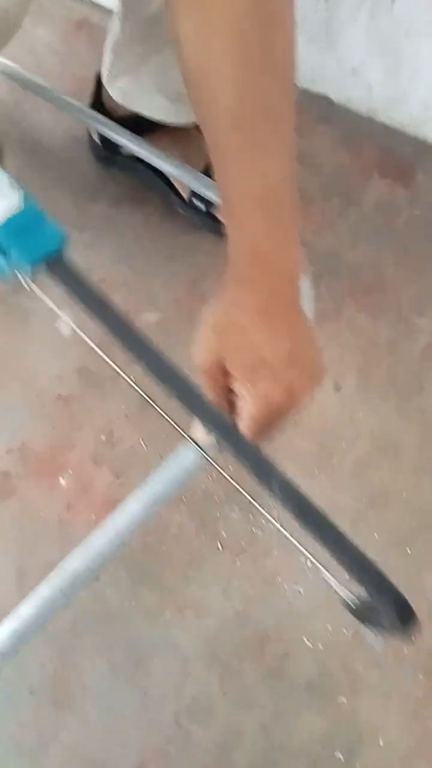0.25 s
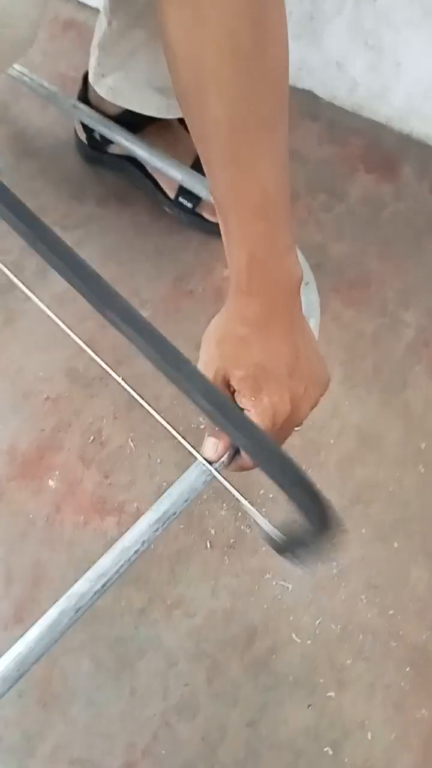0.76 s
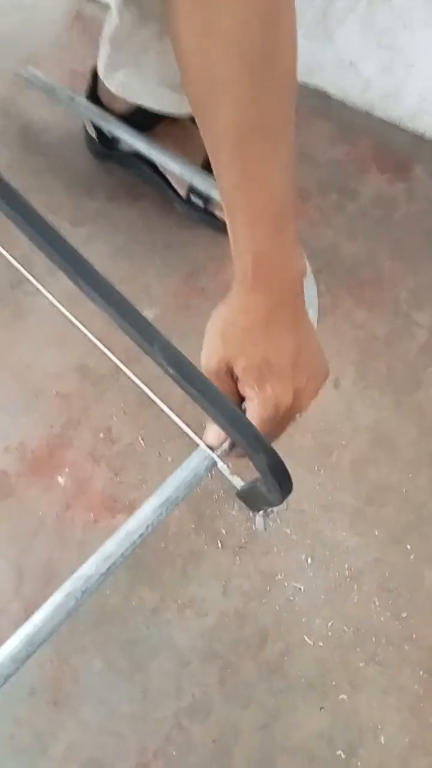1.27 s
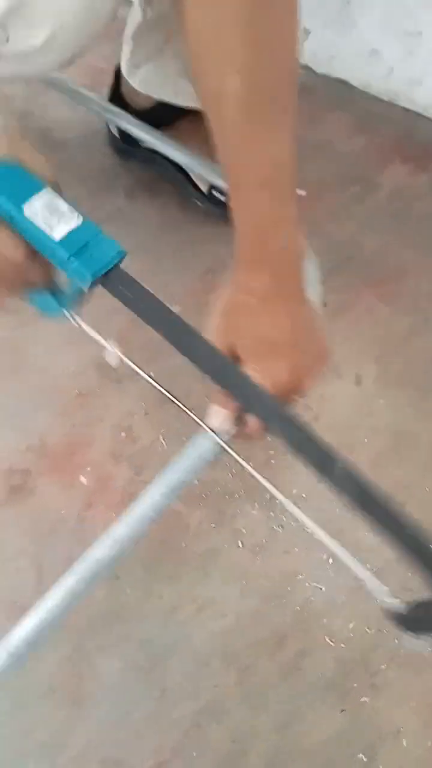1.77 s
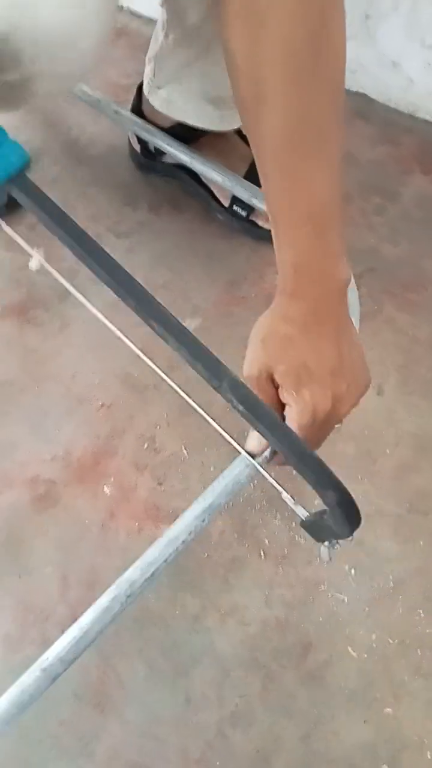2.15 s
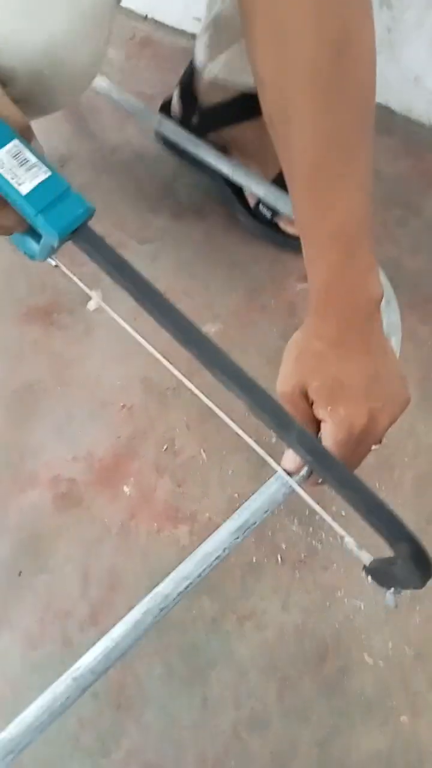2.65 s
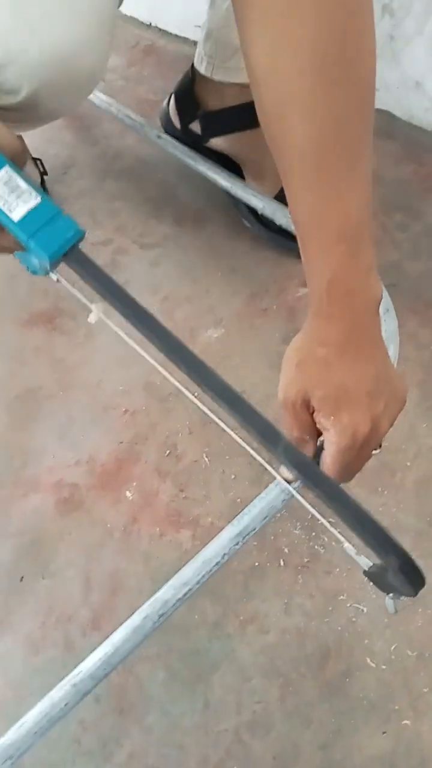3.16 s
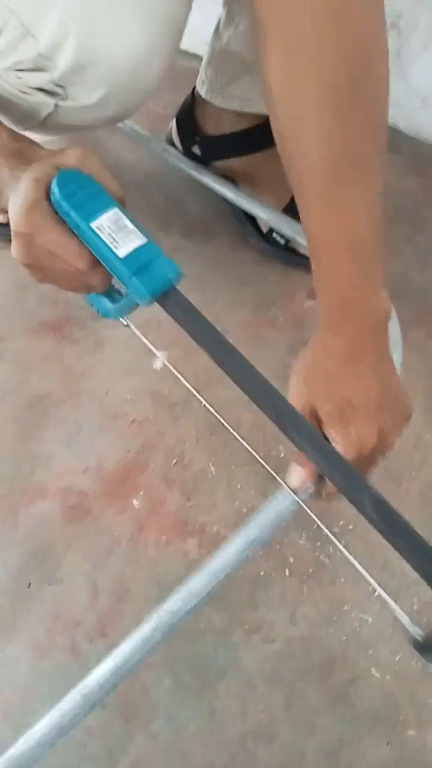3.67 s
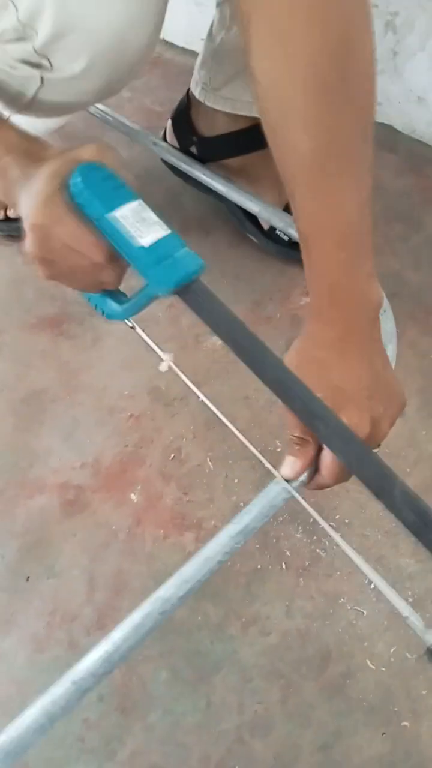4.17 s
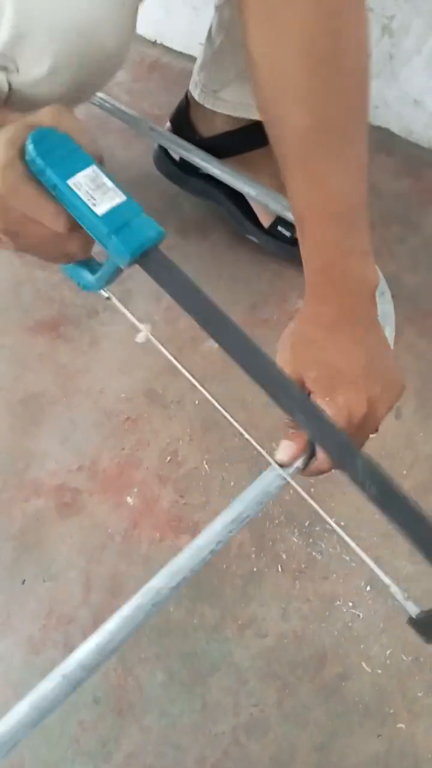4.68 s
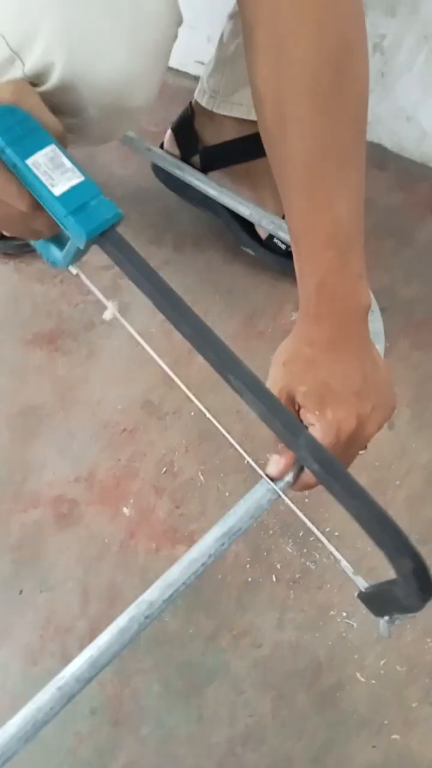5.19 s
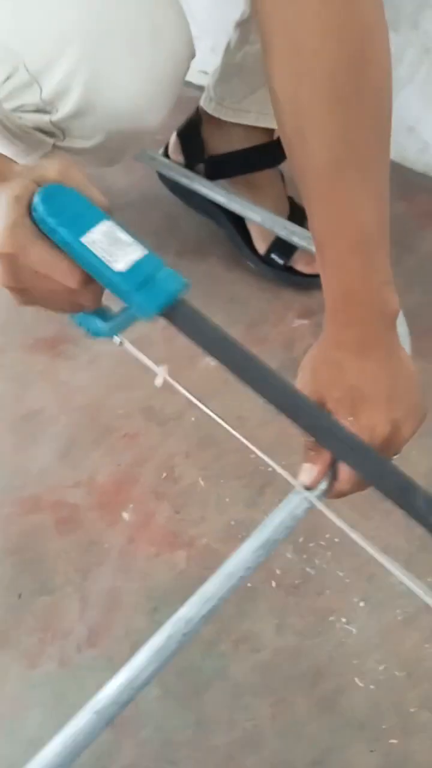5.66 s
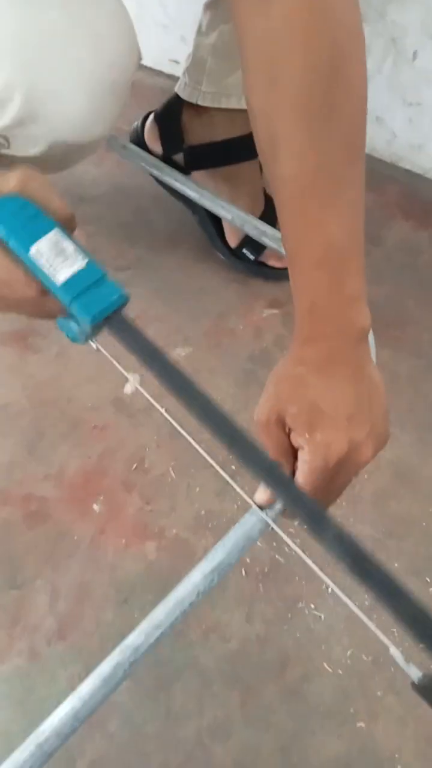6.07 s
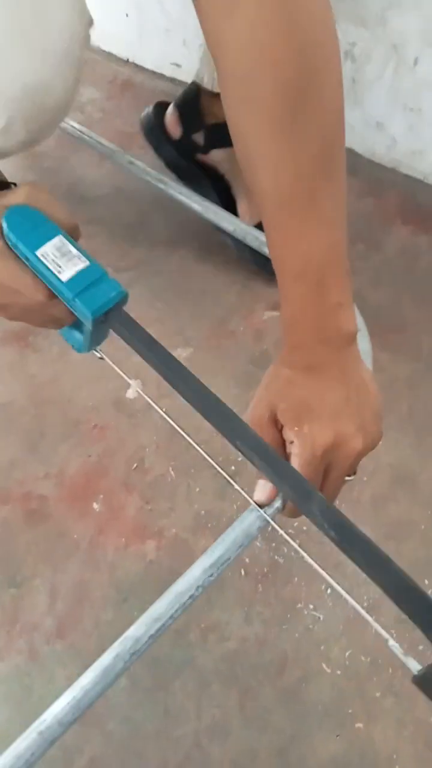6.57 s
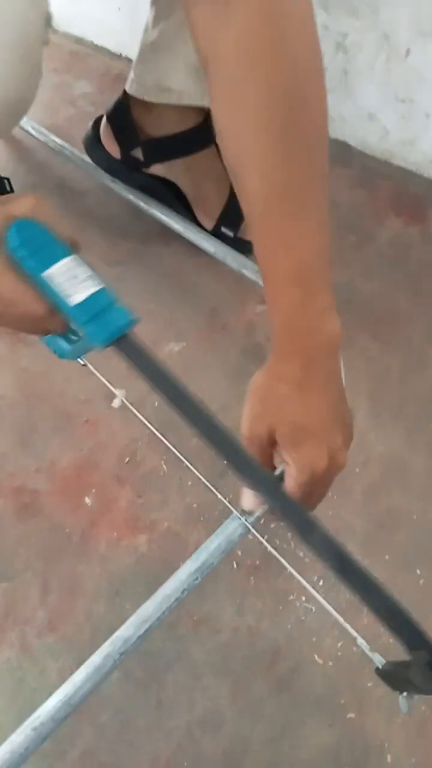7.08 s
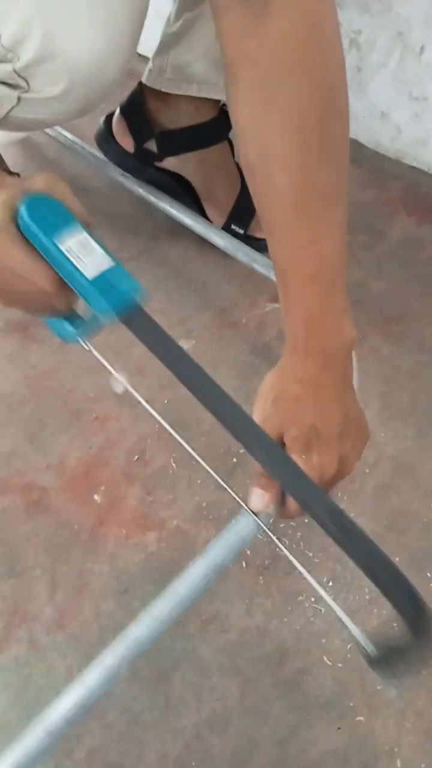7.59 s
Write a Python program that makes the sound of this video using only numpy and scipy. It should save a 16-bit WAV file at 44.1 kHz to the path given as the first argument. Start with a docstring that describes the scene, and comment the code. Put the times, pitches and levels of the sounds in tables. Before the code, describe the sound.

A hacksaw rasps through a hand-held steel pipe in short uneven strokes, with crunches, metallic clanks and brief squeaks in a bare echoing room.

```python
"""The rasp of a hacksaw is heard at once, over the faint rumble of a bare, echoing room.
Teeth cutting a hand-held steel conduit act as a train of snaps and noisy forces that excite its resonances.
The blade crunches and clanks as it catches in the kerf, leaving damped modes of pipe, frame and blade
to ring, and squeaks by stick and slip. Three times the pipe scuffs on the concrete floor with a dull groan;
decaying noise in bands forms the reverberation."""
import sys
import numpy as np
from scipy import signal
from scipy.fft import rfft, irfft
from scipy.io import wavfile
from scipy.ndimage import uniform_filter1d, minimum_filter1d

SR = 44100
rng = np.random.default_rng(int(sys.argv[2]) if len(sys.argv) > 2 else 0)


def waveform_to_disk(signal):
    """Save audio, clipped to [-1, 1], as 16-bit WAV at the path in sys.argv[1]."""
    frames = np.transpose(np.atleast_2d(signal))
    scaled = np.clip(frames, -1, 1) * 32767
    samples = np.round(scaled).astype(np.int16)
    wavfile.write(sys.argv[1], SR, samples)


N = 345744

# Saw strokes: (time of full bite [s], attack [s], hold [s], rasp level [dB],
# hiss of the chips at mid-hold [dB re rasp], judder of the frame at mid-hold [dB re rasp])
SAW_STROKES = [(0.002, 0.0056, 0.026, -27.5, -23, -19.5), (0.153, 0.012, 0.032, -12.5, -15, -15.5),
               (0.425, 0.029, 0.016, -17.5, -20, -15.5), (0.658, 0.022, 0.011, -10.0, -19.5, -12.5),
               (0.792, 0.022, 0.03, -15.5, -13.5, -18.5), (1.0, 0.007, 0.051, -12.0, -16, -15.5),
               (1.231, 0.046, 0.028, -16.0, -19, -10.5), (1.458, 0.0079, 0.04, -12.0, -16.5, -20),
               (1.635, 0.045, 0.073, -24.5, -31, -13), (1.883, 0.03, 0.024, -30.0, -19, -22),
               (2.052, 0.0093, 0.073, -17.0, -14, -20.5), (2.228, 0.0064, 0.02, -20.5, -20.5, -19),
               (2.364, 0.007, 0.048, -13.0, -17.5, -16), (2.553, 0.022, 0.048, -20.5, -17.0, -19),
               (3.505, 0.023, 0.034, -36.5, -16, -7), (3.752, 0.026, 0.007, -9.0, -18.5, -13.0),
               (3.898, 0.01, 0.045, -21.5, -15.5, -14), (4.197, 0.016, 0.026, -11.0, -19.5, -15),
               (4.405, 0.039, 0.017, -16.0, -16.5, -15.5), (4.693, 0.013, 0.025, -12.0, -14.5, -14.5),
               (4.955, 0.021, 0.018, -25.5, -16.5, -10.0), (5.374, 0.035, 0.22, -49, -10, -3),
               (5.605, 0.014, 0.043, -33.0, -25, -22), (5.672, 0.013, 0.037, -11.0, -18.5, -13),
               (5.831, 0.034, 0.026, -24.0, -30.5, -28), (7.371, 0.017, 0.054, -23.5, -16.5, -15),
               (7.685, 0.022, 0.007, -9.5, -21.5, -14.5), (7.828, 0.015, 0.011, -20.5, -12.5, -11)]
STROKE_RELEASE_S = 0.014   # the blade stops at the turn
# Change either side of mid-hold: the teeth skate at first, then dig in
HISS_FADE_DB, JUDDER_BUILD_DB = 2, 13.5
# Blade catching in the kerf: (time [s], knock level before trim [dB], tick level before trim [dB],
# ring level before trim [dB], frequency favoured by the contact point [Hz])
BLADE_CATCHES = [(.2192, -1.5, -24.5, -13, 2950), (.43, -21, -33, -31, 4300),
                 (.4965, -12.5, -38, -34, 2960), (0.702, -7.5, -44, -12.5, 1800),
                 (1.365, -17.5, -48, -22.5, 1606), (1.694, -15.5, -40, -20, 2620),
                 (1.857, -17.5, -43, -42, 3000), (1.875, -19, -54, -20, 2100), (2.204, -20, -56, -15, 1980),
                 (2.218, -7, -32, -27, 1981), (2.4564, -10, -33, -33, 2902), (2.688, -17, -49, -31, 2150),
                 (2.973, 5.5, -15, -2.5, 2390), (3.457, -33.5, -46, -35, 4500),
                 (3.489, -29, -55, -31, 4450), (4.015, -6.5, -24.5, -23.5, 3005),
                 (4.506, -12.5, -32.5, -48, 3007), (5.252, -14.5, -38.5, -22, 1800),
                 (5.498, -25, -49, -27, 1402), (5.778, -18, -39, -15, 2348), (5.828, -14, -47, -38, 2921),
                 (6.358, -4, -28, -10, 2560), (6.837, -33, -56, -34, 1850), (6.8634, -5.5, -33, -12, 3300)]
# Blade binding and squeaking: (time [s], level [dB], mean pitch [Hz], decay to 1/e [s])
BLADE_SQUEAKS = [(.22, -6, 2950, 0.016), (.79, -24, 2900, 0.02), (4.172, -19, 2760, .02),
                 (4.682, -16.5, 2929, .02)]
# Pipe slipping on the floor: (time of full slip [s], attack [s], hold [s], level before scaling [dB])
FLOOR_SLIPS = [(.68, 0.069, 0.1684, -38.5), (1.27, 0.09, .18, -28), (2.237, 0.023, .08, -37.5)]
SLIP_RELEASE_S = 0.023

# Free modes of pipe and saw frame: (frequency [Hz], relative level [dB], t60 [s])
STEEL_MODES = [(1060, -9.5, 0.58), (1693, -6.5, 0.6), (1880, -26, 0.19), (2097, 3.5, 0.12),
               (2130, -4, 0.49), (2450, 0, 0.25), (2615, -3.5, 0.56), (2830, -14, 0.24), (2850, 7, 0.068),
               (2920, 1.5, 0.33), (3520, -13, 0.77), (3750, -12, .45), (3880, -5, 0.34), (3830, -1.5, 0.42),
               (4000, 3, 0.4), (4370, -3, 0.48), (4710, 3.5, 0.11)]
# High modes of the taut blade, woken by a sharp tick: (frequency [Hz], relative level [dB], t60 [s])
BLADE_MODES = [(3310, 1.5, 0.63), (4700, -2.5, 0.61), (5260, -6, .5), (5670, -14, .45), (7774, -16.5, 0.6),
               (7980, -12.5, 0.32)]
# Resonances of the held pipe under the blade: (frequency [Hz], width [Hz], peak [dB])
PIPE_RESONANCES = [(261, 40, -8), (448, 61, 2.5), (615, 22, 6), (832, 105, 8), (994, 32, 2.5),
                   (1080, 32, 4.5), (1393, 133, 4.5), (1854, 110, 3.5), (2880, 135, 4), (3020, 85, 5),
                   (3717, 107, 4.5), (4234, 440, 2.5), (4325, 130, 3.5)]

# Spectrum of the cutting rasp: (frequency [Hz], relative density [dB per Hz])
RASP_SPECTRUM = [(500, -26), (950, -1.5), (1300, -3), (2000, -2), (3100, 0), (4200, 2.5), (4700, -2.5),
                 (5500, -13.5), (6600, -29.5), (9000, -33)]
# Spectrum of the finest chips and of the ticks: (frequency [Hz], relative density [dB per Hz])
HISS_SPECTRUM = [(3500, -38), (5500, 4), (7000, -10), (9000, -3.5), (11300, 2), (13000, 0.5), (14500, -12),
                 (16000, -48)]
# Spectrum of the frame's judder: (frequency [Hz], relative density [dB per Hz])
JUDDER_SPECTRUM = [(60, -44), (150, -23.5), (280, -6), (400, -1.5), (580, -6), (800, -3), (1050, -7),
                   (1500, -24), (3000, -40.5)]
# Spectrum of a catching tooth's crunch: (frequency [Hz], relative density [dB per Hz])
CRUNCH_SPECTRUM = [(80, -44), (350, -14.5), (600, -22.5), (1000, -3.5), (1700, 2.5), (3100, 2.5),
                   (4300, 1.5), (5300, -9.5), (6600, -35), (10000, -83)]
# Spectrum of the pipe rubbing on concrete: (frequency [Hz], relative density [dB per Hz])
SCUFF_SPECTRUM = [(70, -20), (140, -13), (185, -2.5), (255, 0), (320, -8), (420, -21), (900, -57)]
# Spectrum of the room's rumble: (frequency [Hz], relative density [dB per Hz])
RUMBLE_SPECTRUM = [(30, -31), (44, -5), (54, -20), (66, 2), (85, -10.5), (170, -2.5), (350, -13),
                   (650, -25), (4200, -26.5), (6500, -50.5), (15000, -55)]
# Course of the rumble: (time [s], level [dB])
RUMBLE_LEVEL = [(0, -49), (3.5, -49), (6.2, -46), (7.2, -42), (7.8, -42.5)]

# Reverberation time of the bare room: (frequency [Hz], t60 [s])
REVERB_T60 = [(150, 1.9), (450, 0.6), (950, 0.8), (2000, 0.54), (4000, 0.6336), (8000, 0.51), (14000, 0.5)]
# Strength of the reverberation: (frequency [Hz], level [dB re direct sound])
REVERB_LEVEL = [(150, -8.5), (450, 3), (950, -3), (2000, -1.5), (4000, -7.5), (8000, -0.5), (14000, -19)]
CUTOFF_HZ = 15700


def from_db(db):
    """Logarithmic level: 20 dB is a tenfold amplitude."""
    return 10 ** (np.asarray(db) / 20)


def rms_one(x):
    """Normalization: scale a signal to unit rms."""
    return x / np.sqrt(np.mean(x ** 2) + 1e-20)


def at_hz(points, hz):
    """Logarithmic frequency: interpolate a spectrum along the axis of pitch."""
    f, value = np.transpose(points)
    return np.interp(np.log(hz + 1), np.log(f), value)


def coloured(x, spectrum, peaks=(), size=8192):
    """Minimum-phase filtering: a causal response of unit energy, with a broad spectrum and resonances."""
    hz = np.arange(size // 2 + 1) * SR / size
    db = at_hz(spectrum, hz)
    for f, width, peak_db in peaks:
        db = db + peak_db / (1 + (2 * (hz - f) / width) ** 2)
    # Folding the cepstrum onto positive time makes the response causal
    cepstrum = irfft(np.log(from_db(db)))[:size // 2]
    cepstrum[1:] *= 2
    response = irfft(np.exp(rfft(cepstrum, size)))
    return signal.fftconvolve(x, response / np.linalg.norm(response))[:N]


def drift(per_s):
    """Band-limited chance: random values joined by lines, at unit rms."""
    knots = rng.standard_normal(N // 10)
    return rms_one(np.interp(np.arange(N) / SR * per_s, np.arange(len(knots)), knots))


def add(out, s, sound):
    """Superposition: mix a sound in from a given time."""
    start = int(s * SR)
    out[start:start + len(sound)] += sound[:N - start]


def swell(full_s, attack_s, hold_s, release_s):
    """Exponential envelope: effort grows to its full value, holds and dies away."""
    t = np.arange(N) / SR - full_s
    fallen = np.maximum(-t / attack_s, 0) + np.maximum((t - hold_s) / release_s, 0)
    return np.exp(-np.minimum(fallen, 20)) * (fallen < 10)


def strokes():
    """Depth of cut: within each stroke the hiss weakens and the judder builds as the teeth dig in."""
    rasp, hiss, judder = np.zeros((3, N))
    for s, attack_s, hold_s, level_db, hiss_db, judder_db in SAW_STROKES:
        effort = from_db(level_db) * swell(s, attack_s, hold_s, STROKE_RELEASE_S)
        moving = np.flatnonzero(effort)
        since_middle_s = moving / SR - s - hold_s / 2
        dug_in = np.clip(since_middle_s / (hold_s + 2 * attack_s), -1, 1)
        rasp += effort
        hiss[moving] += effort[moving] * from_db(hiss_db - HISS_FADE_DB * dug_in)
        judder[moving] += effort[moving] * from_db(judder_db + JUDDER_BUILD_DB * dug_in)
    return rasp, hiss, judder


def teeth(effort, full_speed_hz=880, speed_power=0.14, jitter=0.1, uneven_db=2.0, release=0.7):
    """Relaxation: each tooth snags and lets go with a snap, then its force fades until the next."""
    speed = (effort / effort.max()) ** speed_power
    rate_hz = full_speed_hz * speed * np.exp(jitter * drift(300))
    passed = np.cumsum(rate_hz) / SR
    tooth = passed.astype(int)
    depth = from_db(uneven_db * np.clip(rng.standard_normal(N), -2, 2))[tooth]
    snaps = depth * (np.diff(tooth, prepend=0) > 0)
    force = depth * np.exp(-(passed % 1) / release)   # release in tooth spacings
    return rms_one(snaps - snaps.mean()), rms_one(force)


def sliding_contact(x, shift_db=3.5, shifts_per_s=22, count=10):
    """Moving excitation point: as the cut slides along the blade, ever other bands are favoured."""
    spectrum, hz = rfft(x), np.arange(N // 2 + 1) * SR / N
    place = np.interp(hz, [500, 5500], [0, count - 1])
    gains = from_db(shift_db * np.array([drift(shifts_per_s) for _ in range(count)]))
    gains = gains / np.sqrt(np.mean(gains ** 2, axis=0))
    out = np.zeros(N)
    for k, gain in enumerate(gains):
        overlap = np.maximum(1 - np.abs(place - k), 0)   # neighbouring triangular bands
        out += gain * irfft(spectrum * overlap, N)
    return out


def sawing(snap_db=-3, judder_snap_db=-2, chatter_db=2.0):
    """Forced vibration: tooth snaps and tearing chips shake the pipe; the finest chips hiss."""
    rasp_gain, hiss_gain, judder_gain = strokes()
    snaps, force = teeth(rasp_gain)
    rasp_chips, judder_chips, fine_chips = force * rng.standard_normal((3, N))
    grip = from_db(chatter_db * drift(170))   # the blade bounces in the kerf
    cutting = sliding_contact(rasp_chips + from_db(snap_db) * snaps)
    shaking = judder_chips + from_db(judder_snap_db) * snaps
    rasp = coloured(grip * rasp_gain * rms_one(cutting), RASP_SPECTRUM, PIPE_RESONANCES)
    judder = coloured(grip * judder_gain * rms_one(shaking), JUDDER_SPECTRUM, PIPE_RESONANCES)
    hiss = coloured(grip * hiss_gain * fine_chips, HISS_SPECTRUM)
    return rasp + judder + hiss


def rumble():
    """Stationary noise: random pressure with a low-weighted spectrum and a slowly changing level."""
    s, level_db = np.transpose(RUMBLE_LEVEL)
    gain = from_db(np.interp(np.arange(N) / SR, s, level_db))
    return gain * coloured(rng.standard_normal(N), RUMBLE_SPECTRUM)


def room_tail(build_s=0.00089, count=14):
    """Diffuse decay: bare walls give a dense tail that builds quickly and fades at a rate set by band."""
    t = np.arange(SR) / SR
    white, tail = rfft(rng.standard_normal(SR)), np.zeros(SR)
    edges = np.geomspace(60, 18000, count + 1)
    hz = np.arange(len(white))   # one second of noise: bins 1 Hz apart
    for low, high in zip(edges, edges[1:]):
        centre = np.sqrt(low * high)
        decay = np.exp(-np.log(1000) * t / at_hz(REVERB_T60, centre))
        fade = decay * (1 - np.exp(-t / build_s))
        band = irfft(white * (hz >= low) * (hz < high), SR)
        tail += from_db(at_hz(REVERB_LEVEL, centre)) * band * fade / np.linalg.norm(fade)
    return tail


def room(x, count=3):
    """Moving source in a room: saw and body move, so the sound is dealt to changing sets of echoes."""
    shares = np.array([drift(5) for _ in range(count)])
    shares = shares / np.linalg.norm(shares, axis=0)
    return sum(signal.fftconvolve(x * share, room_tail())[:N] for share in shares)


def ringing(modes, t, extra_db, rattle=1.0, rattles_per_s=110):
    """Free vibration: struck modes die away, their phases jostled as the steel rattles in the kerf."""
    hz, mode_db, t60 = np.transpose(modes)
    steps = np.cumsum(rng.standard_normal((len(hz), 400)), axis=1)   # random walk of each phase
    jostle = np.array([np.interp(t * rattles_per_s, np.arange(len(row)), row) for row in steps])
    cycles = np.outer(hz, t) + rng.random((len(hz), 1))
    waves = np.sin(2 * np.pi * cycles + rattle * jostle)
    decay = np.exp(-np.log(1000) * np.outer(1 / t60, t))
    return from_db(mode_db + extra_db) @ (waves * decay)


def knocks(rise_s=0.0023, crunch_s=0.005, tick_s=0.0081, crunch_trim_db=4, tick_trim_db=2,
           ring_trim_db=-9, blade_db=-18, blade_growth=0.83, off_focus_db=9):
    """Impulsive excitation: a catching tooth crunches for milliseconds and leaves the steel ringing."""
    crunch, tick, ring = np.zeros((3, N))
    t = np.arange(SR // 2) / SR
    bite = 1 - np.exp(-t / rise_s)
    sharpest_db = np.array(BLADE_CATCHES)[:, 2].max()
    steel_hz = np.array(STEEL_MODES)[:, 0]
    for s, knock_db, tick_db, ring_db, focus_hz in BLADE_CATCHES:
        grit = bite * rng.standard_normal(len(t))
        add(crunch, s, from_db(knock_db + crunch_trim_db) * grit * np.exp(-t / crunch_s))
        add(tick, s, from_db(tick_db + tick_trim_db) * grit * np.exp(-t / tick_s))
        # Modes far from the favoured frequency are excited less
        octaves_off = np.abs(np.log2(steel_hz / focus_hz))
        steel_db = ring_db + ring_trim_db - off_focus_db * octaves_off
        add(ring, s, bite * ringing(STEEL_MODES, t, steel_db))
        # The blade's twang grows faster than the tick, so mainly a hard jam wakes it
        wake_db = blade_db + (1 + blade_growth) * (tick_db - sharpest_db)
        add(ring, s, bite * ringing(BLADE_MODES, t, wake_db, rattle=2.6))
    return coloured(crunch, CRUNCH_SPECTRUM, PIPE_RESONANCES) + coloured(tick, HISS_SPECTRUM) + ring


def squeaks(waver=0.024, rise_s=0.001):
    """Stick and slip on the side of the blade: a short tone of unsteady pitch."""
    out, t = np.zeros(N), np.arange(SR // 2) / SR
    for s, level_db, hz, decay_s in BLADE_SQUEAKS:
        pitch_hz = hz * (1 + waver * drift(480)[:len(t)])
        envelope = (1 - np.exp(-t / rise_s)) * np.exp(-t / decay_s)
        tone = np.sqrt(2) * np.sin(2 * np.pi * np.cumsum(pitch_hz) / SR)
        add(out, s, from_db(level_db) * envelope * tone)
    return out


def scuff(slip_db=4.5):
    """Dry friction: the pipe slips unevenly on the concrete with a dull groan."""
    slips = rms_one(rng.standard_normal(N) * from_db(slip_db * drift(90)))
    drag = np.zeros(N)
    for s, attack_s, hold_s, level_db in FLOOR_SLIPS:
        drag += from_db(level_db) * swell(s, attack_s, hold_s, SLIP_RELEASE_S)
    return coloured(slips * drag, SCUFF_SPECTRUM) / np.sqrt(2)


def scene():
    """Superposition of the work on the pipe, its reverberation and the room's rumble."""
    work = sawing() + knocks() + squeaks() + scuff()
    return (work + room(work) + rumble())[None]


def record(dry, limit_db=2.0, release_db_per_s=60, size=64):
    """Peak limiting: gain ducks at the loudest peaks and recovers; the rest is clipped, the top cut."""
    over_db = np.maximum(20 * np.log10(np.abs(dry[0]) + 1e-9) - limit_db, 0)
    recovery_db = release_db_per_s * np.arange(N) / SR
    duck_db = np.maximum.accumulate(over_db + recovery_db) - recovery_db
    gain = from_db(uniform_filter1d(minimum_filter1d(-duck_db, size), size))
    cut = signal.ellip(10, 0.2, 80, CUTOFF_HZ, fs=SR, output="sos")
    return signal.sosfilt(cut, np.clip(dry * gain, -1, 1))


dry = scene()
out = record(dry)
waveform_to_disk(out)
```